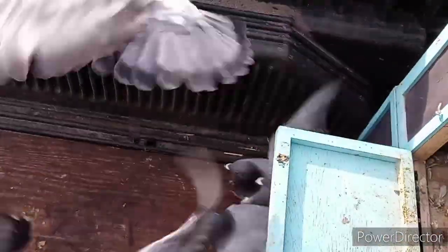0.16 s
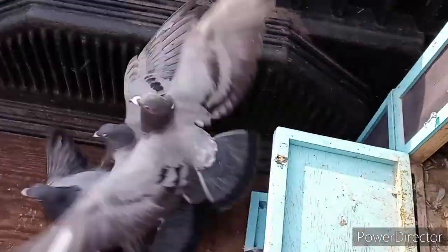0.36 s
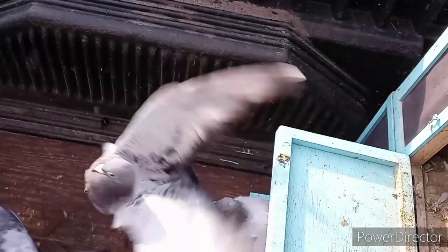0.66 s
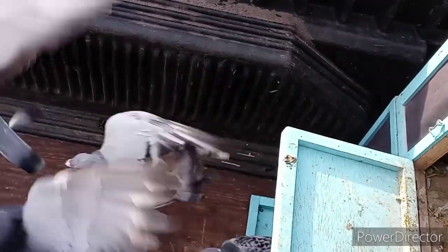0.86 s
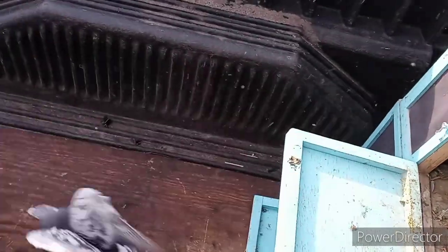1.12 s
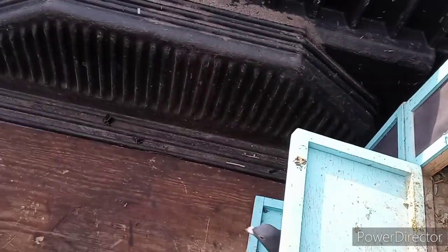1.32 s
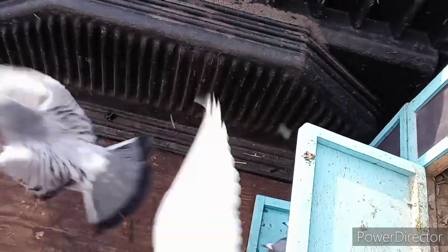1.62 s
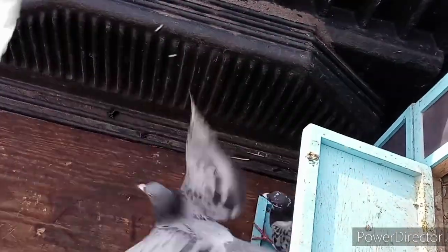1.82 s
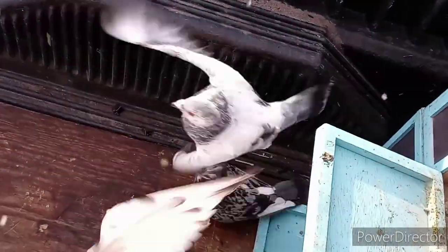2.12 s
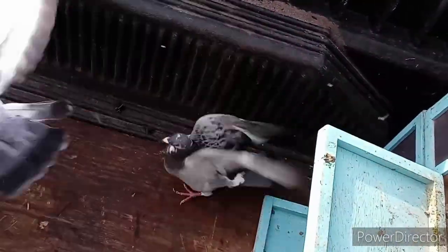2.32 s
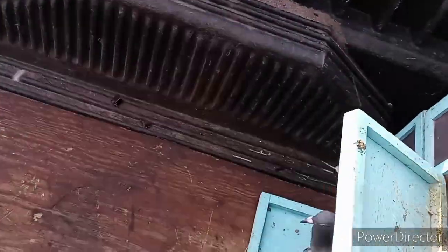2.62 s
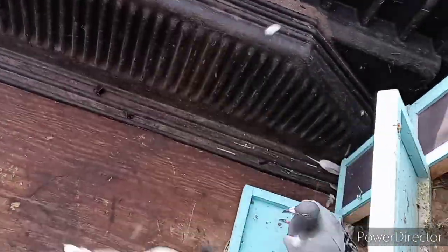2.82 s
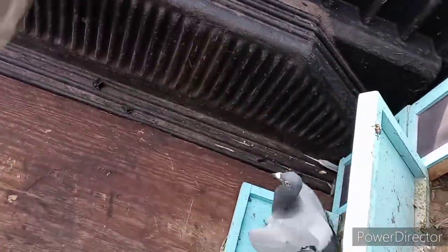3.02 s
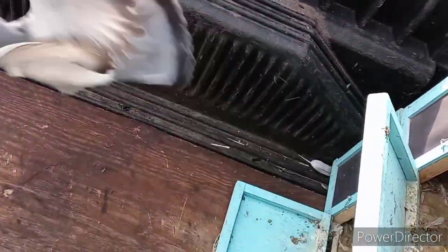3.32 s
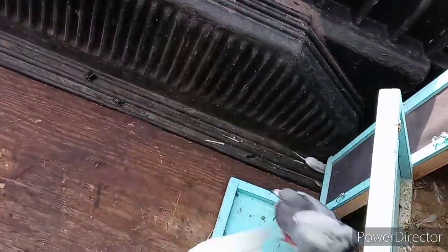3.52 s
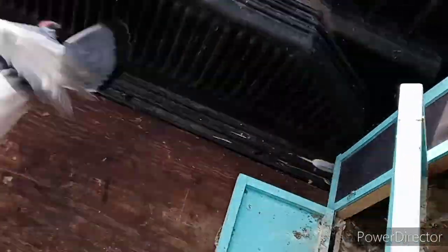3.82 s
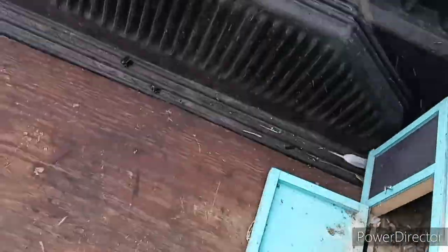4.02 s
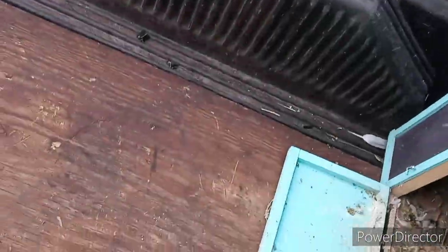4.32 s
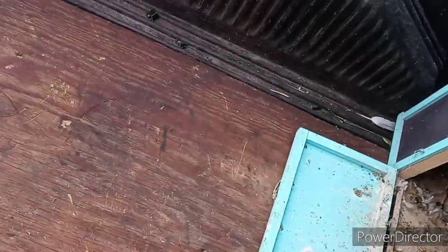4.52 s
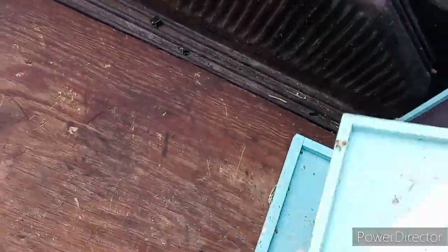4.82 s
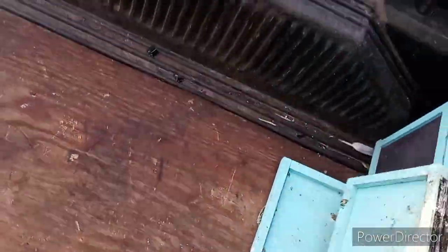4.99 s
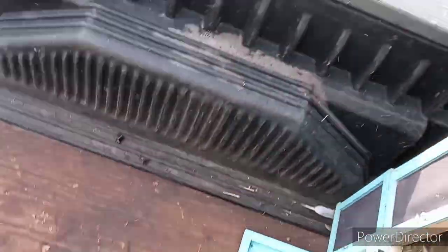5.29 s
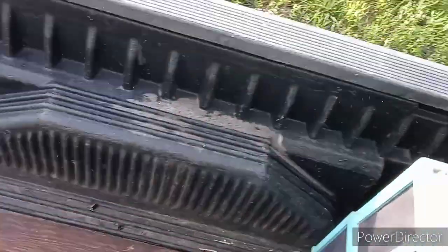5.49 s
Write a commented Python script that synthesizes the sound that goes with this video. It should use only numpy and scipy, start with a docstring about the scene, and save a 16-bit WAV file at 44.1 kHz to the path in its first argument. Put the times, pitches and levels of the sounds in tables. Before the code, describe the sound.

From the very start, many pigeons fly out of a wooden crate outdoors, close to the microphone. Their wings clap in a dense, irregular stream of crisp, crackling slaps, many with a dull thud of air, while wings farther off rustle and whoosh. The downwash buffets the microphone with low rumbles and hollow pops, strongest from about 0.3 to 1.7 seconds. The clapping stays busy until around 3.3 seconds, then spaces out and ends near 4.2 seconds, followed by one more strong, low gust at 4.3. As the rustle fades, light ticks and scuffs of the crate being handled run from about 4.4 to 5.6 seconds. Hollow wooden knocks come in two quick groups, at about 5.0 and 5.4 seconds, each leaving a short, low ring and slight rattle in the panels. A faint, steady hiss lies behind everything.

```python
"""Pigeons leaving a crate

Outdoors, pigeons burst out of a wooden crate and past a close microphone. Near wings clap, a slap of
feathers with a thud of squeezed air; wings farther off rustle, and the downwash buffets the microphone.
The flock thins out, then the crate is handled and knocked, and its panels ring."""
import sys
import numpy as np
from scipy import signal
from scipy.io import wavfile
from scipy.ndimage import uniform_filter1d

SR = 44100
rng = np.random.default_rng(int(sys.argv[2]) if len(sys.argv) > 2 else 0)


def wav_out(sig):
    """Save sig, one row per channel (or a flat mono array), as 16-bit PCM at SR to the path in sys.argv[1]."""
    wavfile.write(sys.argv[1], SR, np.round(np.clip(np.atleast_2d(sig).T, -1, 1) * 32767).astype(np.int16))


N = 249195

# how busy the flock is, heard as the rustle of feathers: (time [s], level [dB])
FLOCK_RUSTLE = [(0, -28), (.34, -25), (.39, -30.5), (.45, -24.5), (.6, -29.5), (.88, -26), (1.16, -28.5),
                (1.42, -28.5), (2.05, -26.5), (2.2, -29.5), (3.76, -30), (4.03, -29), (4.36, -37.5),
                (4.95, -44.5), (5.65, -43.5)]
# spectrum of feathers brushing and slapping: (frequency [Hz], level per Hz [dB])
FEATHER_SPECTRUM = [(750, 2.5), (1200, -3), (1700, 0), (2100, -4.5), (3200, -4), (4200, 0), (5400, 1.5),
                    (6800, 2), (8000, 5), (11000, 2.5), (14800, 2.5), (16000, -18)]
# spectrum of air pushed by wings: (frequency [Hz], level per Hz [dB])
AIR_SPECTRUM = [(71, -56), (120, -22), (264, 4), (353, -5.5), (422, 3.5), (976, -8.5), (1710, -16),
                (2500, -17), (3250, -21.5), (5500, -120)]
# spectrum of wind on the microphone: (frequency [Hz], level per Hz [dB])
WIND_SPECTRUM = [(12, -53), (20, -14), (103, 4), (233, -2), (318, -4), (410, -16), (475, -13), (700, -12.5),
                 (910, -53), (1540, -120)]
# birds passing close to the microphone: (start [s], length [s], downwash level [dB])
CLOSE_PASSES = [(0.01, 0.49, -26.5), (0.364, 0.17, -24.5), (0.465, 0.042, -26), (0.77, 0.27, -19),
                (1.18, 0.06, -19.5), (1.366, 0.28, -18.5), (1.772, 0.28, -28), (3.778, 0.14, -26),
                (4.047, 0.17, -28.5), (4.309, 0.32, -27.5)]
# single gusts and hollow pops of air on the microphone: (time [s], level [dB], pitch [Hz])
GUSTS = [(0.302, -12, 280), (0.373, -0.5, 178), (0.385, -2, 234), (0.452, -16, 150), (.466, -11, 274),
         (0.485, -5.5, 252), (0.502, -5.5, 130), (0.681, -8.5, 266), (.782, -5, 146), (0.853, -9, 168),
         (.871, -11, 149), (.886, -9, 138), (0.941, -5, 226), (0.986, -5.5, 101), (1.3722, -4.5, 193),
         (1.447, -6, 91), (1.62, -29, 184), (1.657, -8, 200), (2.631, -14, 262), (2.73, -12, 603),
         (2.916, -16.5, 294), (2.998, -11.5, 280), (3.126, -11, 577), (4.217, -11, 188),
         (4.284, -18.5, 272), (4.317, 1, 135), (4.327, -18, 322), (4.337, -7.5, 155), (4.358, -11.5, 108),
         (4.385, -17, 138), (4.4, -10, 103), (4.573, -16.5, 376)]
# resonances of the wooden panels: (frequency [Hz], level [dB], time to fall 60 dB [s])
CRATE_MODES = [(152, 2.5, 0.06), (155, -11, 0.39), (213, 4.5, 0.038), (290, -13, 0.093), (432, -7.5, 0.029),
               (588, -8.5, 0.025), (1270, -37, .04)]
# knocks on the crate: (time [s], push level [dB], push length [s], crack level [dB],
# crack low-pass [Hz], crack decay [s], stretch of ring and rattle [factor])
CRATE_KNOCKS = [(5.0091, -7, 0.0016, -11.5, 6350, 0.0064, 2.06),
                (5.082, -4, 0.00078, -41, 1490, 0.0034, 0.3),
                (5.37, -15.5, 0.00073, -32, 900, 0.0024, 0.33),
                (5.4047, -4, 0.0028, -20.5, 2610, 0.0069, 1.62),
                (5.449, -13, 0.00058, -55, 1500, .004, 0.41)]
# ticks and scuffs as the crate is handled: (time [s], level [dB], relative body level [dB], decay [s])
HANDLING_TICKS = [(4.4502, -9, 0.5, 0.005), (4.535, -18.5, 7, 0.0028), (4.557, -4.5, -3, 0.0038),
                  (4.570, -11, 8, 0.0016), (4.5745, -10, 2, 0.0035), (4.6046, -16, -14, 0.0064),
                  (4.665, -8.5, -4, 0.0033), (4.687, -24, 5, 0.0016), (4.7243, -17, -4, 0.0033),
                  (4.772, -7.5, 0.5, 0.0037), (4.8005, -22, 5, 0.006), (4.814, -21.5, 11, 0.0082),
                  (4.8504, -22, 6, 0.0056), (4.8851, -12, 2, 0.0046), (4.9252, -18, -15, 0.0059),
                  (4.934, -12, -13, 0.0028), (5.0835, -12.5, -27, 0.0068), (5.1108, -14, 5, 0.0051),
                  (5.1916, -25, 6.5, 0.041), (5.2316, -28, -16, 0.0031), (5.2634, -22, -12, 0.004),
                  (5.324, -14.5, -17, 0.0029), (5.4532, -18, -9, 0.0061), (5.6086, -24, 6, 0.0079)]
# wing claps close to the microphone: (time [s], slap level [dB], relative thud level [dB], decay [s])
WING_CLAPS = [(0.0178, -7.5, -6.5, 0.021), (0.061, -8.5, -4.5, 0.012), (0.106, -7.5, -9.5, 0.013),
              (0.135, -4, -9, 0.0083), (0.169, -4, -33, 0.0028), (0.2433, -2, -40, 0.0062),
              (.416, -5, -16, 0.011), (0.456, -10, -32, 0.02), (0.478, -3, -9, 0.0043),
              (0.511, -4.5, -3.5, 0.0042), (0.543, -1, -11, 0.0066), (0.5697, -5, -15, 0.014),
              (0.585, -12.5, -4, 0.013), (0.616, -13, -25, 0.0049), (0.64, -5, -35, 0.0041),
              (0.6596, -10, -5.5, 0.026), (0.695, -7.5, -1, 0.0098), (0.7339, -3.5, -33, 0.0032),
              (0.749, -10, -4, 0.038), (0.8105, -4, -40, 0.0044), (0.836, -10, -2, 0.041),
              (0.8763, -11, -3.5, 0.031), (1.007, -7.5, -9, 0.0067), (1.0192, -6, -40, 0.0045),
              (1.057, -8, -10, 0.0026), (1.076, -0.5, -25, 0.0045), (1.1299, -3.5, -34, 0.0039),
              (1.1623, -10, -24, 0.0027), (1.182, 0, -15, 0.0062), (1.246, -7.5, -10, 0.0039),
              (1.2717, -14, -30, 0.0027), (1.279, -6.5, -2.5, 0.01), (1.337, -8, -0.5, 0.0036),
              (1.36, -14.5, -4, 0.041), (1.4448, -10.5, -4, 0.0042), (1.466, -12, 0, 0.0032),
              (1.512, -14, -20, 0.012), (1.541, -3, -34, 0.0042), (1.576, -3.5, -27, 0.0057),
              (1.6159, -7.5, 0, 0.0049), (1.637, -7.5, -31, 0.0051), (1.684, -11, -22, 0.021),
              (1.741, -10, -58, 0.011), (1.839, -2, -24, 0.0018), (1.892, -12, -1, 0.0035),
              (1.912, -14.5, -6, 0.0086), (1.9427, -10, -2, 0.005), (2.043, -4, -29, 0.0091),
              (2.087, -1.5, -20, 0.0069), (2.124, -9.5, -6, 0.016), (2.154, -7, -4, 0.0024),
              (2.1867, -7, -7.5, 0.0091), (2.2626, -7.5, -50, 0.0039), (2.293, -9, -5, 0.015),
              (2.3119, -11.5, -19, 0.0021), (2.3429, -1.5, -6, 0.0043), (2.394, -19, -32, 0.0035),
              (2.4021, -3.5, 1.5, 0.005), (2.4342, -5, -19, 0.0069), (2.446, -8.5, -2, 0.0049),
              (2.4753, 0, -13, 0.0077), (2.52, -6, -5, 0.0061), (2.531, -6, -5, 0.0045),
              (2.575, -4.5, -13.5, 0.013), (2.6247, -10.5, -5.5, 0.032), (2.663, -23.5, 11, 0.0059),
              (2.696, -9.5, -4.5, 0.019), (2.7487, -13, -6, 0.013), (2.7815, -3, -9.5, 0.011),
              (2.8, -5, -20, 0.0016), (2.861, -13.5, -3.5, 0.011), (2.887, -11.5, -7.5, 0.028),
              (2.9685, -4, -32, 0.0045), (2.987, -9, -14, 0.0074), (3.03, -8, -18, 0.0029),
              (3.072, -12.5, -1, 0.013), (3.13, -12.5, -3, 0.005), (3.169, -7.5, -14, 0.011),
              (3.1892, -16, -24, 0.0032), (3.226, -0.5, -31, 0.0047), (3.287, -7.5, -11, 0.0079),
              (3.355, -18, 0.5, 0.014), (3.3925, -13, -6, 0.0037), (3.59, -10.5, -32, 0.0019),
              (3.6503, -9.5, -29, 0.01), (3.681, -7, -12, 0.011), (3.732, -14, -8, 0.0018),
              (3.7466, -5, -19, 0.0075), (3.8091, -12, 0, 0.0077), (3.86, -7.5, -3.5, 0.011),
              (3.977, -4.5, -14, 0.0038), (4.051, -12, -22, 0.0022), (4.128, -19.5, -4, 0.023),
              (4.2012, -15.5, -34, 0.015), (4.243, -17, -19, 0.0061)]

CREST_DB, THUD_CREST_DB = -10, -4   # from a peak to the rms of the noise under it
BODY_HZ, TREBLE_STEP_HZ, TREBLE_STEP_DB = 3000, 7400, -8.5   # top of the body; above this frequency the microphone hears the treble weaker by this gain


def from_db(db):
    """Gain of a level in dB."""
    return 10 ** (np.asarray(db) / 20)


def unit_rms(x):
    """The signal scaled to rms 1."""
    return x / np.sqrt(np.mean(x ** 2) + 1e-20)


def add(track, start_s, piece):
    """Mixes a piece into a track at a time."""
    i = round(start_s * SR)
    track[i:i + len(piece)] += piece[:N - i]


def butter(x, order, hz, kind="low"):
    """The signal through a Butterworth filter."""
    return signal.sosfilt(signal.butter(order, hz, kind, fs=SR, output="sos"), x)


def split(x, hz):
    """The parts below and above a frequency."""
    return butter(x, 9, hz), butter(x, 9, hz, "high")


def drift(rate_hz):
    """A slow random wander of rms 1."""
    pole = np.exp(-2 * np.pi * rate_hz * 20 / SR)   # one step every 20 samples
    slow = signal.lfilter([1], [1, -2 * pole, pole * pole], rng.standard_normal(N // 20 + 2002))[2000:]
    return np.interp(np.arange(N) / 20, np.arange(len(slow)), unit_rms(slow))


def burst(db, rise_s, decay_s):
    """An envelope with a quick swell and an exponential fall, peaking at the given level."""
    t = np.arange(SR // 10) / SR
    shape = (1 - np.exp(-t / max(rise_s, 1e-4))) * np.exp(-t / max(decay_s, 5e-4))
    return from_db(db) * shape / shape.max()


def tails(clicks, decay_s):
    """Gives each click an exponential tail."""
    return signal.lfilter([1], [1, -np.exp(-1 / (decay_s * SR))], clicks + 1e-18)


def ring(clicks, hz, t60):
    """One resonance: each click starts a dying sine of its own height."""
    r, w = from_db(-60 / (t60 * SR)), 2 * np.pi * hz / SR
    return signal.lfilter([0, np.sin(w)], [1, -2 * r * np.cos(w), r * r], clicks + 1e-18)


def band_noise(spectrum, flicker_db, rate_hz):
    """Third-octave bands of noise, each with its own level and flicker; rms 1 in all."""
    hz, db = np.transpose(spectrum)
    edges = hz[0] * 2 ** np.arange(0, np.log2(hz[-1] / hz[0]), 1 / 3)
    edges = np.append(edges, hz[-1])
    out, white = 0, rng.standard_normal((2, N))
    for k, (low, high) in enumerate(zip(edges, edges[1:])):
        band = butter(white[k % 2], 2, [low, high + 1], "band")
        level_db = np.interp(np.log(low * high) / 2, np.log(hz), db)
        out = out + band * from_db(level_db + flicker_db * drift(rate_hz))
    return unit_rms(out)


def outdoor_hiss():
    """A faint, steady treble hiss behind everything."""
    return from_db(-54.5) * butter(rng.standard_normal(N), 9, 2000, "high")


def far_wings(flock_db, ticks_per_s=100):
    """Wings farther off: a hiss of feathers, fine dry ticks at random moments and a whoosh of air."""
    ticks = (rng.random(N) < ticks_per_s / SR) * rng.uniform(0.11, 2.2, N)
    flutter = 0.94 + tails(ticks, decay_s=0.0014)
    low, high = split(band_noise(FEATHER_SPECTRUM, flicker_db=1.5, rate_hz=30), TREBLE_STEP_HZ)
    whoosh_db = 1.5 + 0.21 * (flock_db - flock_db.max())   # fades faster than the feathers
    whoosh = from_db(whoosh_db + 3.26 * drift(22.5))
    whoosh *= band_noise(AIR_SPECTRUM, flicker_db=4.46, rate_hz=17.2)
    feathers = from_db(3.44 * drift(45)) * flutter * (low + from_db(TREBLE_STEP_DB) * high)
    return from_db(flock_db) * (feathers + whoosh)


def wind_on_mic(flock_db, breeze_db=-41.5, attack_s=0.0033, release_s=0.085, fade_db_per_s=36):
    """Lumpy turbulence on the microphone: a light breeze, stirred air and each close bird's downwash."""
    t = np.arange(N) / SR
    strength = from_db(breeze_db) + from_db(flock_db - 7.5)   # the flock stirs the air
    for start, length, db in CLOSE_PASSES:
        age = np.maximum(t - start, 0)
        rise = np.minimum(age / attack_s, 1)
        release = np.exp(-np.maximum(age - length, 0) / release_s)
        strength += from_db(db - fade_db_per_s * age) * rise * release   # strongest at its front
    return strength * from_db(2.6 * drift(30.3)) * band_noise(WIND_SPECTRUM, flicker_db=0.53, rate_hz=9.2)


def gusts():
    """Single eddies hit the microphone and ring for a few low cycles."""
    out, t = np.zeros(N), np.arange(SR // 10) / SR
    for start, db, hz in GUSTS:
        phase = 2 * np.pi * hz * t * (1.1 - 11 * t)   # the eddy slows as it passes
        sharp_front = 0.35 * np.sin(2.435 * phase) * np.exp(-t / 0.11)
        t60 = 0.015 + 1.1 / hz   # lower gusts last longer
        add(out, start, -burst(db, 0.0074, t60 / np.log(1000)) * (np.sin(phase) + sharp_front))
    return out


def crate_knocks(rattle_db=-30, rattle_s=0.016, damp_s=0.03):
    """A knock is a soft push that rings the wooden panels, under a short crack of wood on wood."""
    out, t = np.zeros(N), np.arange(N) / SR
    grits = rng.standard_normal((len(CRATE_KNOCKS), SR // 10))
    wobbles = [from_db(1.6 * drift(18)) for _ in CRATE_MODES]   # loose slats make the ring uneven
    next_touches = [knock[0] for knock in CRATE_KNOCKS[1:]] + [N / SR]
    for knock, grit, next_touch in zip(CRATE_KNOCKS, grits, next_touches):
        start, db, push_s, crack_db, crack_hz, crack_decay, stretch = knock
        push, pulse = np.zeros(N), np.hanning(int(push_s * SR) + 3)
        add(push, start, from_db(db) * pulse / pulse.sum())
        jolts = butter(grit[::-1], 9, 284, "high")   # struck slats keep jolting the smaller panels
        add(push, start, burst(db + rattle_db, push_s, rattle_s * stretch) * jolts)
        crack = burst(crack_db, 0.0053, crack_decay) * unit_rms(butter(grit, 2, crack_hz))
        add(out, start - 0.0015, crack)
        damping = np.exp(-np.maximum(t - next_touch, 0) / damp_s)   # the lid's next touch stills the ring
        for k, (hz, mode_db, t60) in enumerate(CRATE_MODES):
            polarity = (-1) ** (k // 2)
            out += ring(push, hz, stretch * t60) * from_db(mode_db) * polarity * wobbles[k] * damping
    return butter(out, 2, 95, "high")   # small panels give no deep bass


def handling_ticks():
    """Light ticks and scuffs of the crate being handled, as envelopes for body, slap and sizzle bands."""
    body, slap, sizzle = np.zeros((3, N))
    for start, db, body_db, decay in HANDLING_TICKS:
        add(body, start, burst(db + CREST_DB + body_db, 0.0003, decay))
        add(slap, start, burst(db + CREST_DB, 0.00029, decay))
        add(sizzle, start, burst(db + CREST_DB, 0.00012, decay))
    return np.array([body, slap, sizzle])


def crackling_noise(envelopes, snaps_per_s=300):
    """Fills body, slap and sizzle envelopes with feather noise, out of which single quills snap."""
    body, slap, sizzle = envelopes
    snapping = rng.random(N) < snaps_per_s / SR
    snap_db = 2.5 + 3.5 * np.minimum(rng.exponential(1, N), 3)
    crackle = 1 + tails(snapping * from_db(snap_db), decay_s=0.000093)
    below_sizzle, high = split(band_noise(FEATHER_SPECTRUM, flicker_db=1.2, rate_hz=40), TREBLE_STEP_HZ)
    low, middle = split(below_sizzle, BODY_HZ)
    return crackle * (body * low + slap * middle + from_db(TREBLE_STEP_DB) * sizzle * high)


def wing_thuds():
    """Air squeezed out between clapping wings gives a dull thud."""
    envelope = np.zeros(N)
    for start, db, thud_db, decay in WING_CLAPS:
        add(envelope, start, burst(db + thud_db + THUD_CREST_DB, 0.00065, 0.95 * decay))
    air = band_noise(AIR_SPECTRUM, flicker_db=1, rate_hz=25)
    air /= np.sqrt(uniform_filter1d(air ** 2, size=400) + 0.2)   # evened out, so each clap gets its share
    presence = butter(butter(air, 9, 935, "high"), 9, 2550)   # close claps are brighter than the whoosh
    return envelope * (air + from_db(-3.5) * presence)


def wing_slaps(spread_s=0.00067, swell_s=0.22, crack_within_s=0.0027):
    """Feathers slap one after another and the stiffest quill cracks: three band envelopes, and cracks."""
    slap, sizzle, cracks = np.zeros((3, N))
    quill_click = np.array([0.84, -0.89, -0.5, 0.5])
    for start, db, _, decay in WING_CLAPS:
        rise = spread_s + decay ** 2 / swell_s   # slow strokes swell longer
        add(slap, start, burst(db + CREST_DB, rise, decay))
        add(sizzle, start, burst(db + CREST_DB - 0.5, rise, decay))
        contact_db = db - 800 * decay   # the first contact snaps, less so in slow strokes
        add(slap, start, burst(contact_db + CREST_DB, 0.00024, 0.00092))
        add(sizzle, start, burst(contact_db + CREST_DB, 0.000092, 0.00062))
        add(cracks, start + rng.random() * crack_within_s, from_db(contact_db - 1) * quill_click)
    return np.array([slap, slap, sizzle]), cracks   # the body follows the slap


def scene():
    """Everything as it reaches one microphone close to the crate."""
    flock_db = np.interp(np.arange(N) / SR, *np.transpose(FLOCK_RUSTLE))
    hiss = outdoor_hiss()
    slap_envelopes, cracks = wing_slaps()
    close = wing_thuds() + cracks + crackling_noise(slap_envelopes + handling_ticks())
    return (hiss + far_wings(flock_db) + wind_on_mic(flock_db) + gusts() + crate_knocks() + close)[None]


def record(dry, ceiling=1.1, cutoff_hz=15800):
    """The microphone drops the deep bass and colours the treble; peaks are rounded and the top is cut."""
    mic = butter(dry, 3, 48, "high")
    for hz, width_hz, db in ((6730, 930, 2.67), (7770, 1160, -8)):
        band = signal.lfilter(*signal.iirpeak(hz, hz / width_hz, fs=SR), mic)
        mic = mic + (from_db(db) - 1) * band
    rounded = ceiling * np.tanh(mic / ceiling)
    return signal.sosfilt(signal.ellip(12, 0.5, 70, cutoff_hz, fs=SR, output="sos"), rounded)


dry = scene()
out = record(dry)
wav_out(out)
```